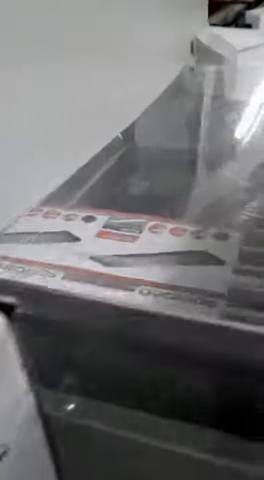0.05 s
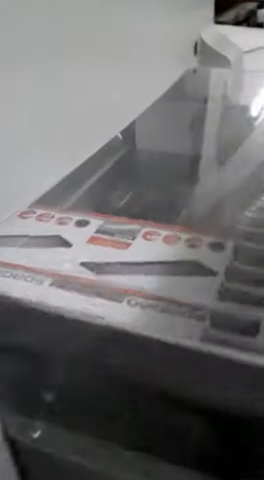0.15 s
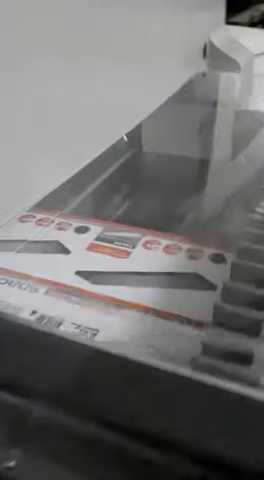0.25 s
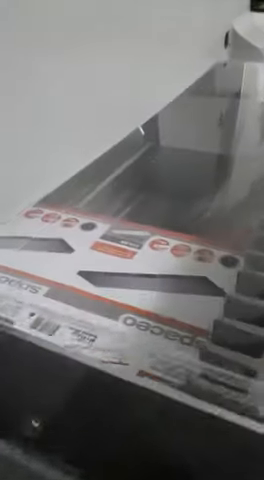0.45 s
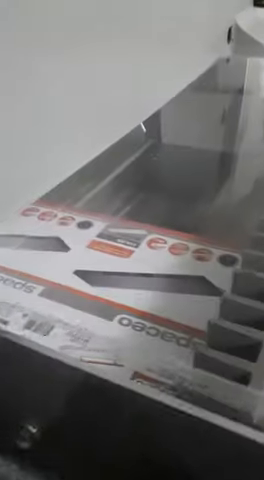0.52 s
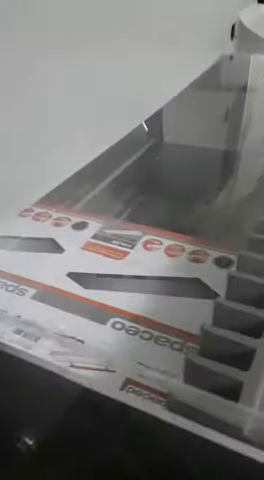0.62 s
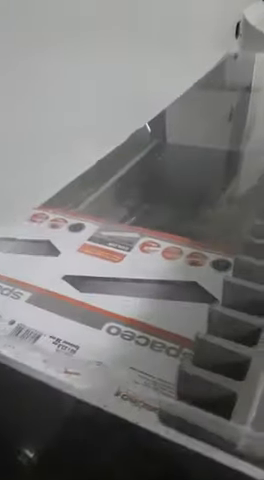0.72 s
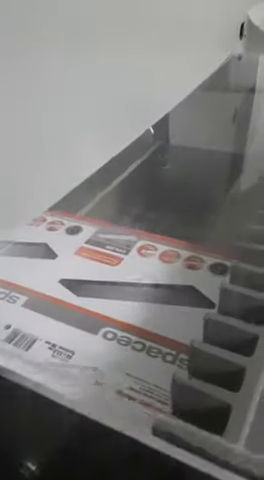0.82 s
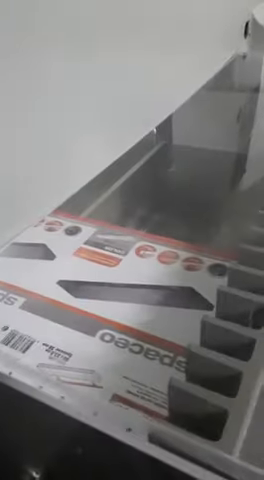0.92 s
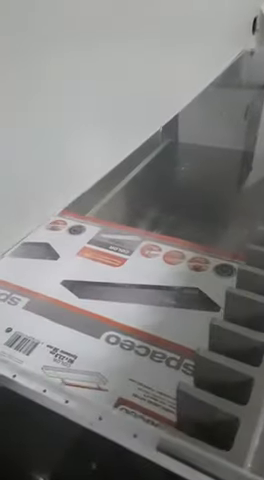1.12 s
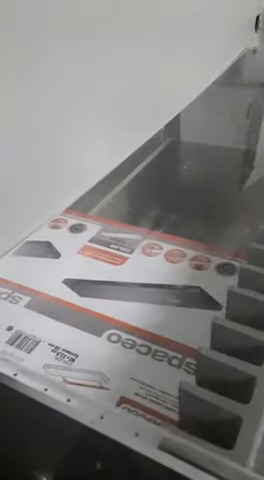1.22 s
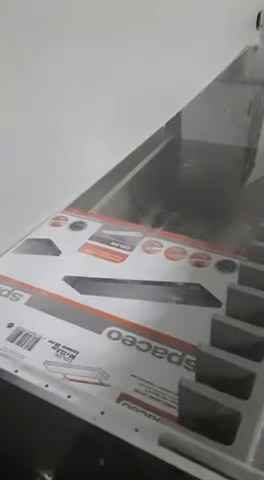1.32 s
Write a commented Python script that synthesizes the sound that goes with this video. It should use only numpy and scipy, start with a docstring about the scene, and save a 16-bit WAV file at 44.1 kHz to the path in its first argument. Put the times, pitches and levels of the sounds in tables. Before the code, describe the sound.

Thuds from a cutting machine's stroke, followed by a squealing whir and a ringing clunk.

```python
"""A faint, brief rustle comes first, then thuds and a low judder from the frame of a cutting machine
making one stroke in a small workshop. A catch clicks, then the drive whirs up with gear noise, a hiss
and the stick-slip squeal of a rubbing part. It stops with a clunk that rings the sheet-metal panels
and dies away over the machine's idle rumble."""
import sys
import numpy as np
from scipy import signal
from scipy.fft import rfft, irfft, next_fast_len
from scipy.io import wavfile
from scipy.ndimage import map_coordinates

SR = 44100
rng = np.random.default_rng(int(sys.argv[2]) if len(sys.argv) > 2 else 0)


def wav_record(signal):
    """Record a signal, one row per channel, as 16-bit PCM in the file named by sys.argv[1]."""
    frames = np.transpose(np.atleast_2d(signal))
    bounded = np.clip(frames, -1, 1)
    # unit amplitude maps onto the largest positive 16-bit level
    quanta = np.round(bounded * 32767).astype(np.int16)
    wavfile.write(sys.argv[1], SR, quanta)


N = 59535
T = np.arange(N) / SR


def amp(db):
    """Decibels to gain."""
    return 10 ** (np.asarray(db) / 20)


def unit(x):
    """Scale to rms 1."""
    return x / np.sqrt(np.mean(x ** 2) + 1e-20)


def along(points, hz):
    """Interpolate (Hz, value) points on a log axis."""
    points_hz, values = np.transpose(points)
    return np.interp(np.log(hz + 1), np.log(points_hz + 1), values)


def curves(rows):
    """One value per sample for each column after the time."""
    times_s, *columns = np.transpose(rows)
    return [np.interp(T, times_s, column) for column in columns]


def wobble(knots_per_s):
    """Smooth random curve."""
    return map_coordinates(rng.standard_normal(2048), [T * knots_per_s], mode="mirror")


def filtered(x, response):
    """Apply a frequency response."""
    size = next_fast_len(N + SR // 2)
    return irfft(rfft(x, size) * response(np.fft.rfftfreq(size, 1 / SR)), size)[..., :N]


def pan(db):
    """Left and right gains for an L-R level difference."""
    return amp(np.array([[.5], [-.5]]) * db)


def lagged(x, lag_s=0.00023):
    """The sound reaches the left ear later."""
    return filtered(x, lambda hz: np.exp(-1j * np.pi * hz * lag_s * np.array([[1], [-1]])))


def tone(hz):
    """Sine of rms 1 on a pitch curve."""
    return np.sqrt(2) * np.sin(2 * np.pi * (np.cumsum(hz) / SR + rng.random()))


def burst(start_s, t60_s, attack_s=.001):
    """Envelope: quick rise, exponential fall."""
    age_s = np.maximum(T - start_s, 0)
    return (1 - np.exp(-age_s / attack_s)) * amp(-60 * age_s / t60_s)


# Each row: frequency in Hz, left-right correlation.
EAR_CORRELATION = [(30, 1), (150, 0.94), (300, 0.78), (550, 0.53), (1100, 0.15), (4000, 0.027),
                   (15000, 0.05)]
# Each row: frequency in Hz, L-R in dB.
EAR_BALANCE = [(60, 7), (130, 0), (250, -2), (500, 0.5), (1100, -1), (2200, -2), (4000, -4.5), (8000, 14.5),
               (13000, 2.5)]

def noise(spectrum):
    """Stereo noise of rms 1: near mono in the bass, diffuse in the treble."""
    def colour(hz):
        angle = np.arccos(np.clip(along(EAR_CORRELATION, hz), -1, 1)) / 2
        return amp(along(spectrum, hz)) * [np.cos(angle), np.sin(angle)]
    mid, side = filtered(rng.standard_normal((2, N)), colour)
    ears = np.array([mid + side, mid - side])
    return unit(filtered(ears, lambda hz: pan(along(EAR_BALANCE, hz))))


# A faint, brief rustle at the very start, then blows on the frame.
# Each row: start in seconds, boom, clack and snap levels in dB, t60 in seconds.
RUSTLE_AND_KNOCKS = [(.002, -56, -54, -55, 0.18), (0.052, -36, -66, -98, 0.96),
                     (.146, -34.5, -60, -55, 0.12), (0.203, -36, -46.5, -92, 0.19),
                     (0.225, -23.5, -32, -78, 0.13), (0.236, -24, -31, -55.5, 0.28),
                     (0.267, -14.5, -35, -55, 0.14), (0.294, -19, -46, -77, 0.33),
                     (.333, -21, -66.5, -77.5, 0.1), (.370, -21.5, -31, -33.5, 0.19),
                     (0.425, -29.5, -56, -66, 0.14), (0.94, -24.5, -28, -42, 0.29),
                     (0.985, -23.5, -72, -55, 0.1)]
# Each row: frequency in Hz, relative level in dB.
BOOM_SPECTRUM = [(30, -37), (70, -23), (130, -6.5), (205, -3), (280, -2), (400, -17.5), (530, -13.5),
                 (750, -18), (1100, -33), (2500, -87.5)]
CLACK_SPECTRUM = [(150, -25), (500, 0), (1100, -0.5), (1800, -4.5), (2250, -11), (2700, -5.5), (3900, -8),
                  (6000, -24), (9000, -41.5), (15000, -53.5)]
SNAP_SPECTRUM = [(1500, -19), (3800, 6), (6000, -3.5), (8200, -0.5), (10000, -11), (13000, -2.5),
                 (16000, -23)]

def rustle_and_knocks(chatter_db=1.0):
    """A faint, brief rustle, then blows that make the frame boom, clack and snap."""
    boom = clack = snap = 0
    for start_s, boom_db, clack_db, snap_db, t60_s in RUSTLE_AND_KNOCKS:
        envelope = burst(start_s, t60_s)
        boom += amp(boom_db) * envelope
        clack += amp(clack_db) * envelope
        snap += amp(snap_db) * envelope
    chatter = amp(chatter_db * wobble(350))
    low = boom * noise(BOOM_SPECTRUM)
    bright = clack * noise(CLACK_SPECTRUM) + snap * noise(SNAP_SPECTRUM)
    return low + chatter * bright


# Each row: start in seconds, level in dB, t60 in seconds.
HEAVY_BLOWS = [(.291, -13, .07), (.372, -20, .08), (.428, -22, .14), (.474, -25, .22), (.941, -15, .07),
               (.982, -23, .08)]
# Each row: frequency in Hz, relative level in dB.
FRAME_MODES = [(106, -6.5), (136, -11), (203, 2.5), (260, -16.5), (339, -5)]

def thumps(pan_db=-2.5):
    """Heavy blows rock the frame and briefly ring its low modes."""
    out = 0
    for start_s, level_db, t60_s in HEAVY_BLOWS:
        ring = sum(amp(db) * np.sin(2 * np.pi * hz * (T - start_s)) for hz, db in FRAME_MODES)
        out += amp(level_db) * burst(start_s, t60_s) * ring
    return out * pan(pan_db)


# Each row: time in seconds, pitch in Hz, level in dB.
JUDDER_CURVE = [(.234, 232, -86), (.242, 228.6, -9), (.285, 219.7, -15), (.296, 201.5, -8),
                (.31, 206.8, -13.5), (.335, 199.2, -13.5), (.35, 178.5, -23.5), (.38, 159, -18.5),
                (.41, 160, -53), (.46, 165, -93)]
# Each row: multiple of the pitch, relative level in dB.
JUDDER_HARMONICS = [(1, -2), (2, -22), (3, -47)]
# Each row: centre in Hz, width in Hz, relative level in dB.
LOOSE_PARTS = [(515.8, 31, -16.5), (705.4, 60, -25), (1966, 65, -36.5), (2680, 92, -39)]

def judder(pitch_jitter=0.04, flutter_db=1, pan_db=-1):
    """The frame shudders under load, shaking loose parts and sinking in pitch as it lets go."""
    hz, level_db = curves(JUDDER_CURVE)
    hz = hz * (1 + pitch_jitter * wobble(120))
    shudder = sum(amp(db) * tone(k * hz) for k, db in JUDDER_HARMONICS)
    rattle = sum(amp(db) * tone(centre_hz + width_hz / 2 * wobble(151.15))
                 for centre_hz, width_hz, db in LOOSE_PARTS)
    return amp(level_db + flutter_db * wobble(131.7)) * (shudder + rattle) * pan(pan_db)


# Each row: time in seconds, level in dB.
DRIVE_ENVELOPE = [(.4, -100), (.46, -43.5), (.55, -33), (.58, -31), (.66, -27), (.78, -28), (.92, -28.5),
                  (.97, -28.5), (1.03, -64), (1.2, -64)]
# Each row: full-speed frequency in Hz, relative level in dB, L-R in dB, start in seconds.
WHINE_PARTIALS = [(1164.5, 0, -3, 0.614), (1200, -6.5, -10, 0.66), (1318, -2.5, 3, 0.72),
                  (1343, -9.5, -1.5, 0.4), (1556, -16.5, -14.5, 0.39), (1641, -13, -13.5, 0.645),
                  (2956, -20, -3, .45), (3032, -12, -3, 0.43), (3386, -26, 11, 0.76),
                  (3680, -21, -5, 0.524)]
# Each row: frequency in Hz, relative level in dB.
GEAR_SPECTRUM = [(600, -25), (950, -6.5), (1150, 0), (1350, 1.5), (1600, -8.5), (1800, -20), (2200, -24.5),
                 (2550, -9.5), (2800, -23), (3150, -6.5), (3700, -16), (4300, -39.5), (8000, -47)]

def drive(stop_s=.94, slowing_per_s=.7, fade_in_s=0.015, drift_hz=5, flutter_db=2.6,
          whine_db=-3, room_db=-9, gear_db=-5, mesh_hz=192, mesh_depth=0.3):
    """Unsteady partials enter one by one over pulsing gear noise; both slow once the drive cuts out."""
    level_db, = curves(DRIVE_ENVELOPE)
    speed = 1 - slowing_per_s * np.maximum(T - stop_s, 0)
    whine = 0
    for hz, db, pan_db, start_s in WHINE_PARTIALS:
        fade_in = np.clip((T - start_s) / fade_in_s, 0, 1)
        gain = amp(db + flutter_db * wobble(25.22)) * fade_in
        whine += gain * tone(hz * speed + drift_hz * wobble(39.7)) * pan(pan_db)
    whine = lagged(whine * amp(level_db + whine_db))
    gears = amp(level_db + gear_db) * noise(GEAR_SPECTRUM)
    meshing = 1 + mesh_depth * tone(mesh_hz * speed)
    return whine + amp(room_db) * room(whine) + gears * meshing


# Each row: time in seconds, pitch in Hz, tone level in dB, rasp level in dB.
SQUEAL_CURVE = [(.43, 930, -100, -110), (.472, 945, -31, -70), (.5, 960, -55, -80),
                (.548, 1075, -55.5, -54), (.568, 1088, -31.5, -38), (.605, 1092, -31.5, -40),
                (.64, 1116, -30.5, -47), (.7, 1100, -31, -49), (.75, 1106, -30.5, -43),
                (.82, 1112, -30.5, -46), (.92, 1100, -31.5, -45), (.99, 1045, -35, -54),
                (1.07, 1030, -90, -105)]

def squeal(pitch_jitter=.002, tone_pan_db=-2, rasp_pan_db=4, room_db=-8):
    """A rubbing part sticks and slips: one tone plus raspy overtones coloured like the hiss."""
    hz, tone_db, rasp_db = curves(SQUEAL_CURVE)
    hz = hz * (1 + pitch_jitter * wobble(90))
    overtones = sum(amp(along(HISS_SPECTRUM, k * hz) + 2 * wobble(30)) * tone(k * hz)
                    for k in range(4, 15))
    rasp = amp(rasp_db) * unit(overtones) * pan(rasp_pan_db)
    fundamental = amp(tone_db + wobble(30)) * tone(hz) * pan(tone_pan_db)
    return lagged(fundamental + rasp) + amp(room_db) * room(rasp)


# Each row: time in seconds, level in dB.
HISS_ENVELOPE = [(.36, -100), (.42, -77.5), (.51, -61), (.54, -49.5), (.575, -38.5), (.63, -37.5),
                 (.75, -36.5), (.95, -36), (1.02, -48), (1.12, -61.5), (1.3, -88)]
# Each row: frequency in Hz, relative level in dB.
HISS_SPECTRUM = [(2350, -27), (4000, -2), (4560, -11.5), (4750, 3.5), (5320, 0.5), (7070, -7.5),
                 (8350, -8.5), (9090, -7), (9850, 0), (12200, -1), (13500, 0), (15600, -9)]

def hiss(low_cut_hz=2560, ripple_db=2.1, ripple_step_hz=110, flutter_db=0.74, pan_db=-0.5):
    """Bright hiss while the drive runs, rippled in colour by the casing."""
    level_db, = curves(HISS_ENVELOPE)
    knots = rng.standard_normal((2, 1024))
    def colour(hz):
        ripple = np.array([map_coordinates(ear, [hz / ripple_step_hz], mode="mirror") for ear in knots])
        high_pass = hz ** 2 / (hz ** 2 + low_cut_hz ** 2)
        return high_pass * amp(ripple_db * ripple)
    envelope = amp(level_db + flutter_db * wobble(90))
    return envelope * unit(filtered(noise(HISS_SPECTRUM), colour)) * pan(pan_db)


# Each row: start in seconds, level in dB, t60 in seconds.
STOP_BLOWS = [(0.954, -18.5, 0.17), (0.993, -33, 0.18), (1.031, -34.5, 0.94)]
# Each row: frequency in Hz, relative level in dB.
CASING_SPECTRUM = [(250, -33.5), (560, 0.5), (700, -16.5), (900, 0), (1200, 5), (1450, -1.5), (1800, -13.5),
                   (3200, -21), (5500, -26), (9000, -37.5)]
CASING_MODES = [(300, -21), (400, -28), (568, 1), (785, -0.5), (895, 0.5), (1049, 2), (1170, -10),
                (1294, -4.5), (1440, -2)]

def panels(ring_db=-2, rattle_db=2.5, blur_hz=14):
    """The sheet-metal casing rattles and rings on after the drive stops."""
    ring = np.array([sum(amp(db) * tone(hz + blur_hz * wobble(81.2)) for hz, db in CASING_MODES)
                     for ear in range(2)])
    envelope = sum(amp(db) * burst(start_s, t60_s) for start_s, db, t60_s in STOP_BLOWS)
    metal = unit(noise(CASING_SPECTRUM) + amp(ring_db) * unit(ring))
    return envelope * metal * amp(rattle_db * wobble(70.83))


# Each row: time in seconds, level in dB.
RUMBLE_ENVELOPE = [(0, -45), (.04, -47.5), (.07, -43), (.22, -38.5), (.44, -30.5), (.52, -29), (.7, -31),
                   (.92, -29), (1.03, -33.5), (1.12, -40.5), (1.24, -40), (1.35, -44.5)]
# Each row: frequency in Hz, relative level in dB.
RUMBLE_SPECTRUM = [(25, -26), (50, -9.5), (75, -27.5), (102, 0.5), (150, -7), (210, -1), (280, -4.5),
                   (370, -2), (500, -13.5), (800, -16.5), (1300, -22), (2200, -28.5), (5000, -47.5),
                   (9000, -54), (15000, -50.5)]
HUM_TONES = [(103, -10.5), (210, -7)]

def rumble(flutter_db=0.18, hum_waver=.012):
    """The running machine rumbles and hums, louder during the stroke."""
    level_db, = curves(RUMBLE_ENVELOPE)
    hum = sum(amp(db + wobble(10.8)) * tone(hz * (1 + hum_waver * wobble(22))) for hz, db in HUM_TONES)
    return amp(level_db + flutter_db * wobble(50)) * unit(noise(RUMBLE_SPECTRUM) + hum)


# Each row: frequency in Hz, t60 in seconds.
ROOM_DECAY = [(150, .35), (1200, 0.79), (5000, 1), (14000, 0.26)]

def room(x):
    """Diffuse workshop reverberation: a noise tail decaying band by band."""
    hz, age_s, bands = signal.stft(rng.standard_normal((2, SR // 2)), SR, nperseg=256)
    decay = amp(-60 * age_s / along(ROOM_DECAY, hz)[:, None])
    tail = signal.istft(bands * decay, SR, nperseg=256)[1]
    return signal.fftconvolve(x, tail / np.linalg.norm(tail[0]), axes=1)[:, :N]


# Each row: frequency in Hz, relative level in dB.
AMBIENCE_SPECTRUM = [(25, -17), (60, 2.5), (120, -13), (400, -39), (1500, -46.5), (4000, -38.5),
                     (8000, -55), (15000, -46.5)]

def ambience(level_db=-50.5):
    """Faint, low noise of the still room."""
    return amp(level_db) * noise(AMBIENCE_SPECTRUM)


def scene(room_db=-12):
    """All parts of the machine in the room."""
    direct = rustle_and_knocks() + thumps() + judder()
    reverb = amp(room_db) * room(direct)
    return direct + reverb + drive() + squeal() + hiss() + rumble() + panels() + ambience()


def record(dry, low_cut_hz=71, top_hz=15750):
    """The microphone thins the deepest bass and passes nothing above the band limit."""
    def response(hz):
        high_pass = -hz ** 2 / (low_cut_hz ** 2 - hz ** 2 + 1j * np.sqrt(2) * hz * low_cut_hz)
        return high_pass * (hz < top_hz)
    return filtered(dry, response)


dry = scene()
out = record(dry)
wav_record(out)
```